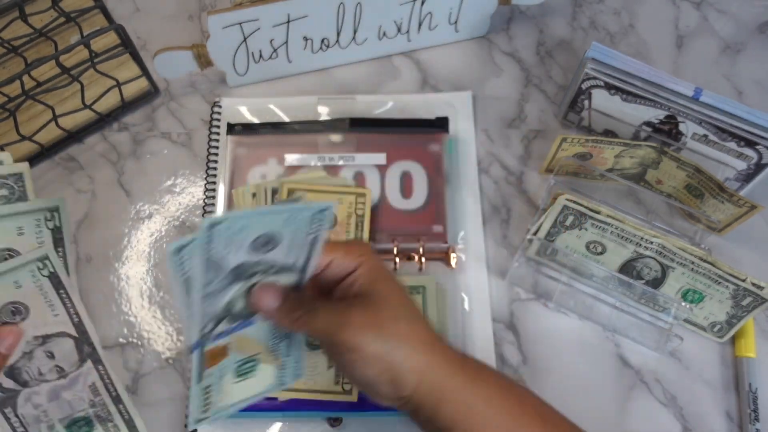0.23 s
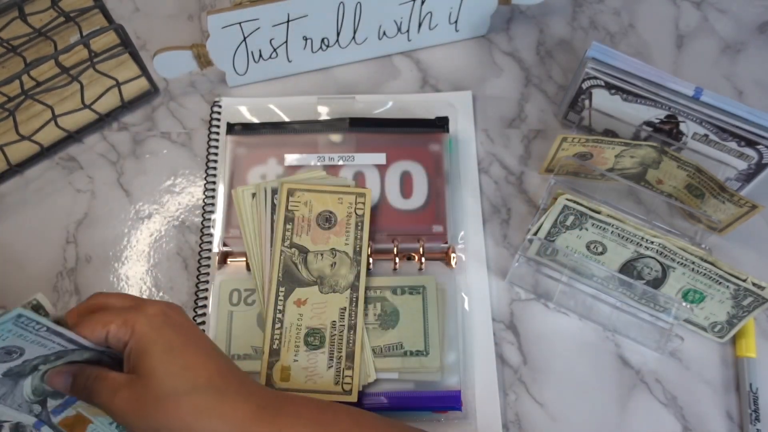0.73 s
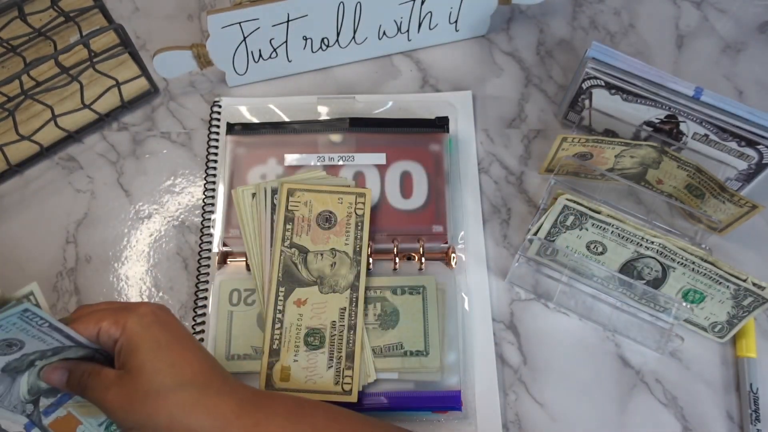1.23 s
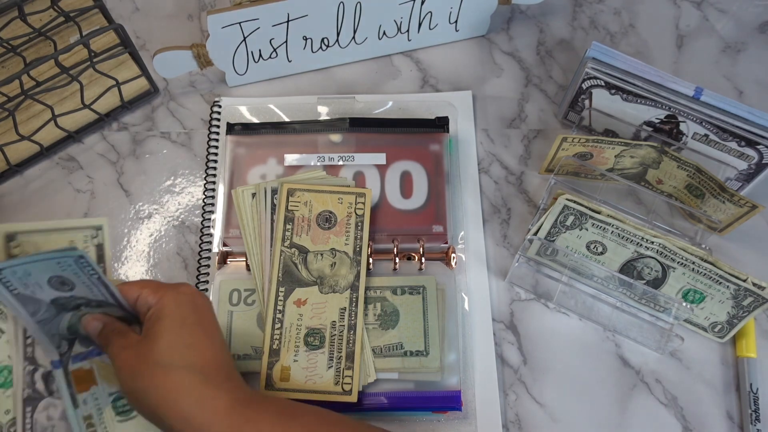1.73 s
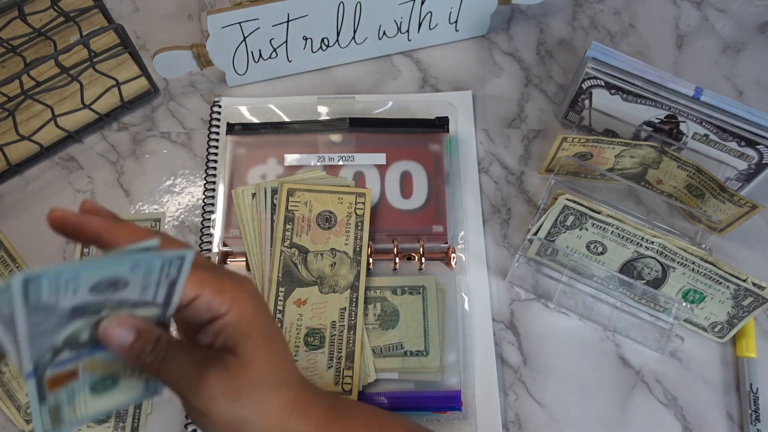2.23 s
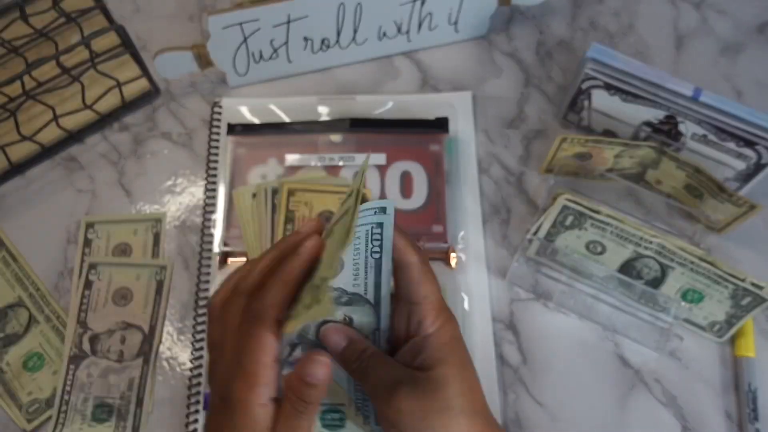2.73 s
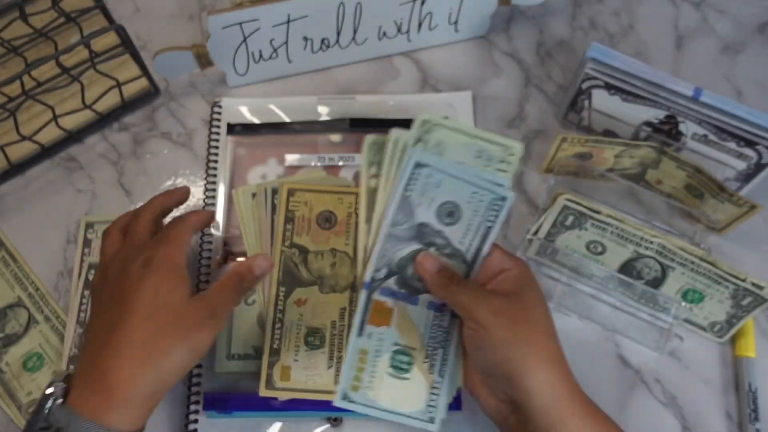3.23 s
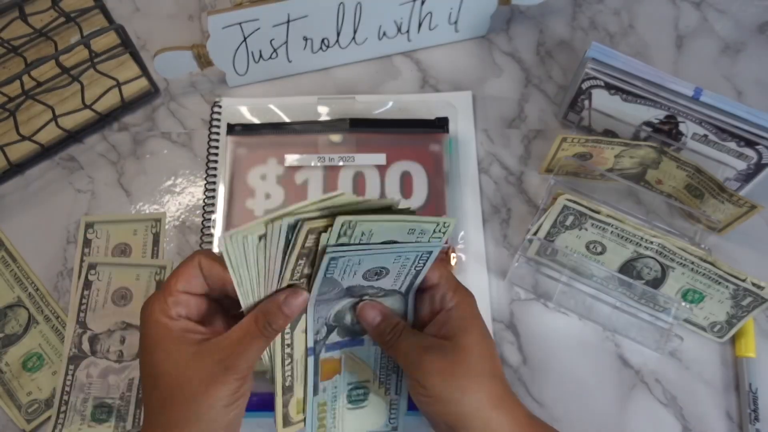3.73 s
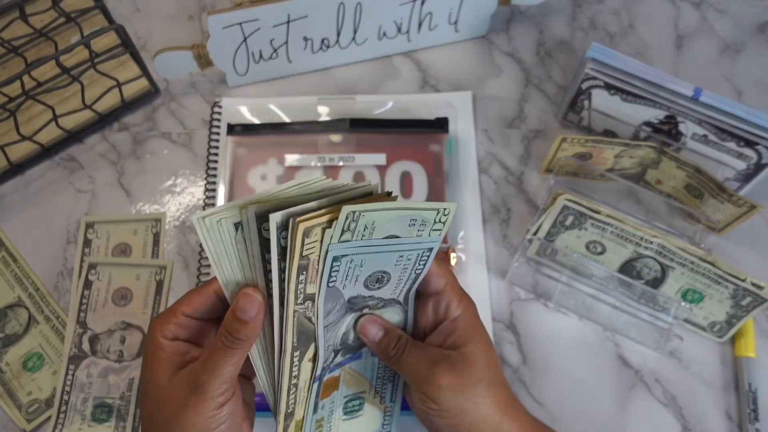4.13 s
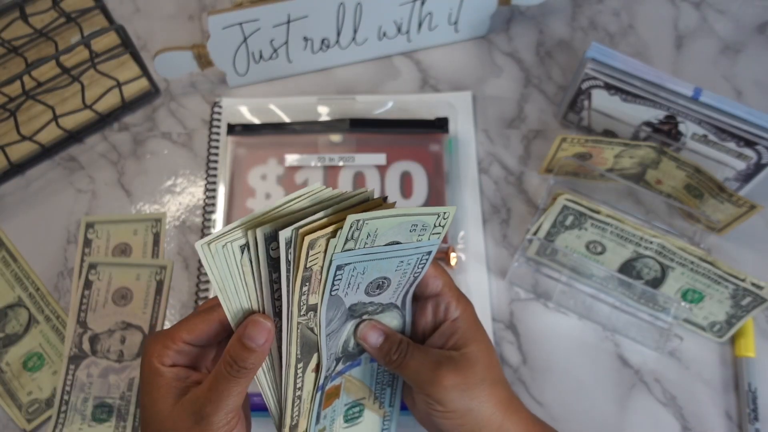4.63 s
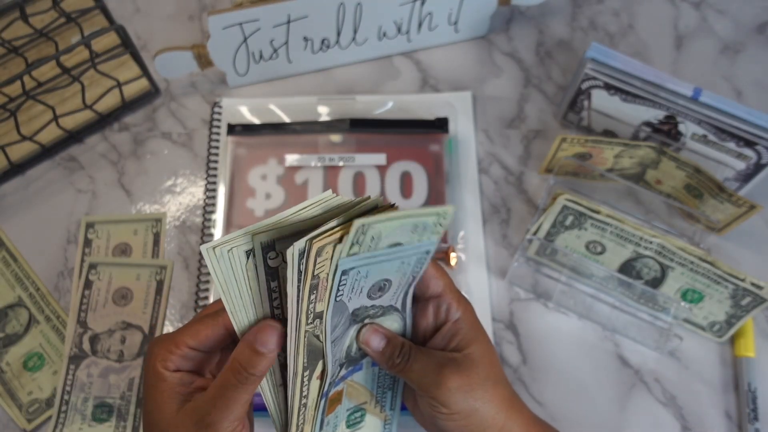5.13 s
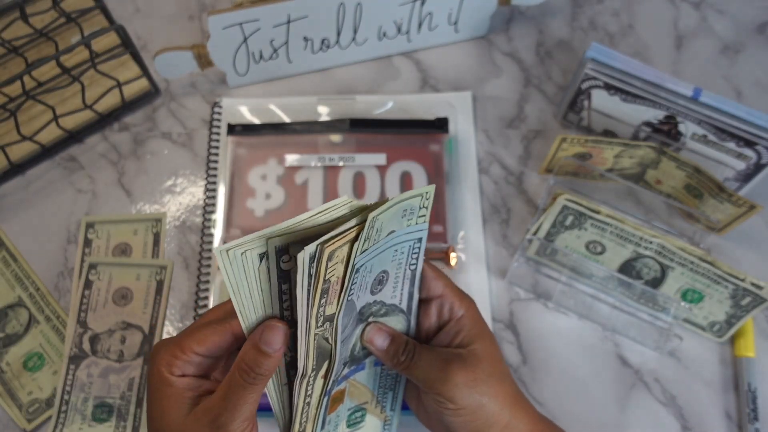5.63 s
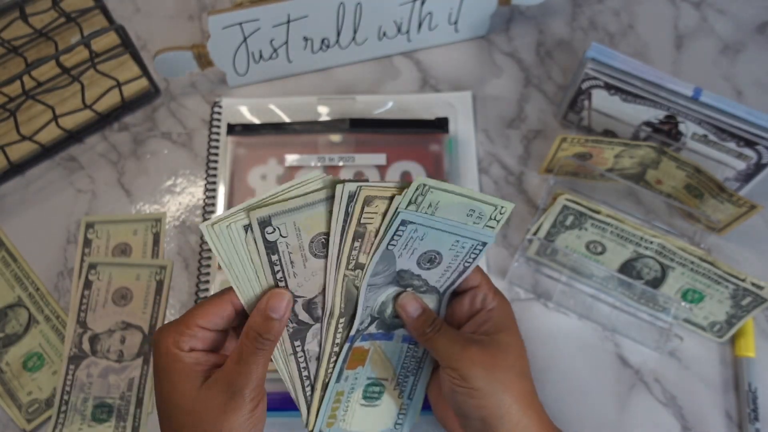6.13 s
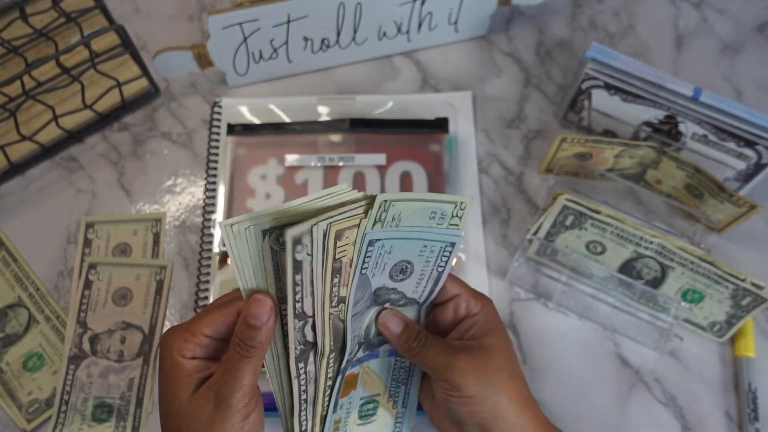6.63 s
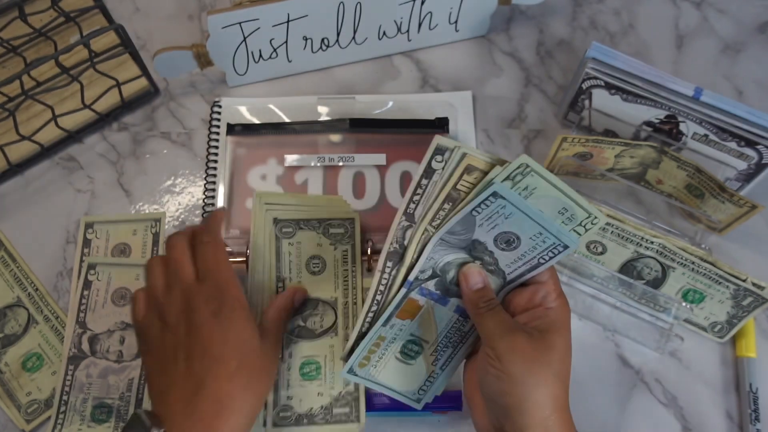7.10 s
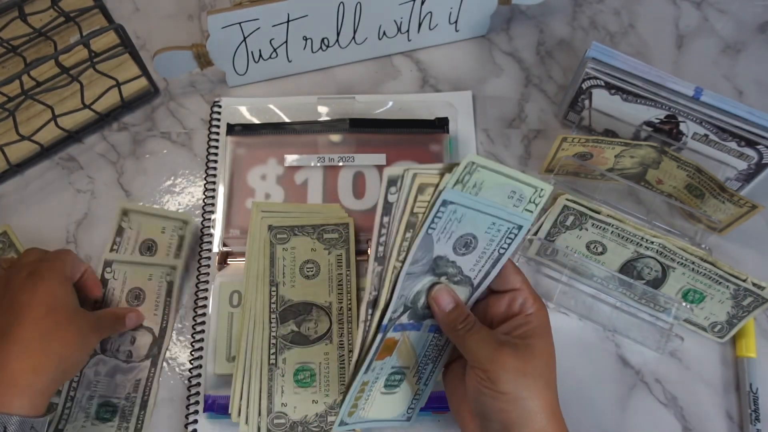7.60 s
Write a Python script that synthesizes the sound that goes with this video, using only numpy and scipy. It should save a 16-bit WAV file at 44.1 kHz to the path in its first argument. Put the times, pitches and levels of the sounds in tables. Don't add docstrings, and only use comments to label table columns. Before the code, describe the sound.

Very close, dry sound of banknotes being handled: dense fibre creaks and sharp buckling cracks as they are gathered, a few strong flicks, then soft edge brushes and tiny ticks while counting. Finally notes are pulled and laid down hard, with hollow table knocks, a short scrape and piercing paper snaps. Small furnished room, steady low rumble and faint microphone hiss.

```python
import sys
import numpy as np
from scipy import signal
from scipy.fft import rfft, irfft
from scipy.io import wavfile
from scipy.ndimage import uniform_filter1d

SR = 44100
rng = np.random.default_rng(int(sys.argv[2]) if len(sys.argv) > 2 else 0)


def transcribe(signal):
    frames = np.atleast_2d(signal).T
    limited = np.clip(frames, -1, 1)
    pcm = np.round(limited * 32767).astype(np.int16)
    wavfile.write(sys.argv[1], SR, pcm)


def voltage_ratio(level):
    return 10 ** (np.asarray(level, float) / 20)


N = 346626

# pitch_hz, level_db (per Hz)
PAPER_COLOUR = [(240, -37), (400, -11.5), (900, -7), (1600, -9), (2100, -3), (2900, 0.5), (3500, 2),
                (4200, 3), (4900, -4.5), (5750, -11), (6600, -9.5), (9000, -14.5), (12000, -18),
                (16000, -30)]
# low_hz, high_hz
PAPER_BANDS = [
    (350, 1900),
    (2000, 5200),
    (6100, 17000),
]

# time_s, hiss_db
HANDLING = [(0, -33.5), (.28, -41.5), (.46, -31.5), (.64, -37), (.94, -35.5), (1.31, -40.5), (1.6, -43),
            (2.05, -40.5), (2.34, -43.5), (2.6, -37), (3.2, -44.5), (3.5, -37.5), (3.87, -48), (5.1, -52.5),
            (5.7, -49), (6.4, -49), (7.2, -45.5), (7.42, -69)]
HANDLING_BODY_DB, HANDLING_SHEEN_DB = -4, -5.5
# peak_s, length_s, hiss_db, body_db (re hiss), sheen_db (re hiss)
PULLS = [(.11, .07, -33, -12, -11), (.22, 0.033, -34, 3.5, 0), (.38, 0.048, -24.5, -2.5, -9),
         (.535, 0.1, -29.5, -5.5, -8), (.6, 0.09, -34.5, -12, 2), (.68, 0.03, -29.5, -4, -1),
         (.86, 0.051, -30, -5, -18), (1.49, 0.2, -36, -5, -22), (1.64, 0.13, -35.5, 5.5, -15),
         (1.74, 0.16, -19, -8.5, -5.5), (1.86, 0.036, -34, -3, -6), (1.99, 0.08, -27.5, -11, -4.5),
         (2.49, 0.074, -32, -0.5, -5), (2.735, 0.08, -19.5, -14, -0.5), (2.87, 0.087, -26.5, -17, -7),
         (3.19, 0.073, -38.5, -16, -9), (3.295, 0.055, -38, 4, -5), (3.39, 0.034, -18, -7, -8.5),
         (3.72, 0.18, -31.5, -7, -5), (3.85, 0.073, -40, 2, -16), (5.19, 0.049, -35, -4, -4),
         (5.27, 0.074, -35, 0, -3), (5.36, 0.19, -44.5, -8, -3), (5.87, 0.3, -36.5, -2.5, -2.5),
         (7.086, 0.035, -24, 4.5, -5), (7.595, 0.043, -22, -5, -3), (7.628, 0.067, -20.5, -2, -5.5),
         (7.86, 0.051, -13.5, -7.5, -1.5)]
# peak_s, length_s, hiss_db, body_db (re hiss), sheen_db (re hiss)
SPRINGS = [(0, 0.034, -33, -2, 5), (.3, 0.096, -31, -20, -5), (.41, 0.053, -27, -3, -2),
           (.7, 0.056, -22, -2.5, -8), (.765, 0.12, -24, -7, -9.5), (1.9, 0.041, -20.5, 2, -20),
           (1.92, 0.15, -35.5, 10.5, -3), (2.405, .06, -30, -11, -2.5), (2.75, 0.11, -14.5, -7, -8),
           (2.8, 0.086, -27, -5, -10.5), (3.0, 0.22, -34.5, -8, -1.5), (3.35, 0.026, -27, -2, -18),
           (3.41, 0.079, -30.5, -8, -12), (3.55, 0.12, -25, -6, -6), (4.27, 0.15, -43.5, -1, -12),
           (6.81, .06, -34, -7, -2), (6.94, 0.14, -30.5, 0, -0.5), (7.0, .06, -31, -11, -9),
           (7.11, 0.21, -38, 0.5, -4.5), (7.44, 0.033, -23, -27, -9), (7.46, 0.14, -35, -1, -21),
           (7.51, 0.041, -28.5, 1, 1), (7.65, 0.12, -26, -4, -6), (7.77, 0.18, -31.5, -5, -5)]
STROKE_DB = 12
PULL_RISE, SPRING_RISE = 0.64, 0.35
# start_s, stop_s
RUBBING_DIPS = [
    (1.882, 1.9),
    (7.4, 7.431),
]

# start_s, kick_peak_db, ring_hz, flutter_db (re kick)
GATHERING_SNAPS = [(.094, -16.5, 647, -20), (0.204, -28, 3620, -6), (.263, -36, 610, -8),
                   (0.293, -32, 647, -24), (.306, -19, 1820, -5.5), (0.347, -3.5, 5130, -14),
                   (.373, -2.5, 3820, -21), (.399, -6.5, 970, -10), (.487, -12.5, 3750, -10),
                   (.662, -8.5, 755, -16), (.7, -2, 4700, -21), (0.764, -17, 3940, -11),
                   (0.859, -15, 3660, -13.5), (1.074, -29, 800, -24), (1.526, -21, 2250, -14),
                   (1.578, -14, 1020, -15.5), (1.591, -24, 990, -21), (1.821, -22.5, 1040, -24),
                   (1.86, -23, 990, -5.5), (1.901, -3.5, 730, -10.5), (2.213, -12.5, 1000, -31),
                   (2.393, -17, 3530, -11.5), (2.434, -30, 830, -2.5), (2.477, -24, 3090, -11),
                   (2.4957, -25, 3980, -16)]
# start_s, kick_peak_db, ring_hz, flutter_db (re kick)
COUNTING_SNAPS = [(2.662, -33, 4190, -16), (2.714, -16, 3850, -9), (2.733, 3, 3700, -17),
                  (2.828, -9.5, 3924, -17), (3.0, -21, 2750, -7.5), (3.273, -25, 1990, -11),
                  (3.339, -13.5, 2420, -13.5), (3.387, -4.5, 2900, -19.5), (3.463, -22, 1400, -15),
                  (3.469, -20, 1520, -16), (3.532, -16.5, 3730, -10), (3.577, -16.5, 3270, -7),
                  (3.684, -30, 3710, -15), (3.748, -23, 2300, -15), (3.7736, -29, 1460, -9),
                  (3.8427, -30, 880, -17), (3.851, -14.5, 3650, -27), (4.331, -18.5, 680, -22),
                  (4.7794, -40, 832, -11), (5.163, -28, 4180, -12), (5.2654, -15, 3420, -18),
                  (5.828, -24.5, 4100, -10), (6.141, -26, 603, -15)]
# start_s, kick_peak_db, ring_hz, flutter_db (re kick)
LAYING_SNAPS = [(6.802, -14, 4200, -20), (6.888, -29, 826, -10), (6.903, -19, 3660, -10),
                (6.9808, -14, 1510, -9), (7.004, -13.5, 1430, -11), (7.045, -14, 980, -6.5),
                (7.084, -4.5, 3970, -12.5), (7.4337, -3, 3540, -15), (7.496, -10, 640, -18),
                (7.515, -15.5, 3400, -9), (7.545, -16, 3400, -12), (7.5618, -8, 4670, -9),
                (7.58, 2.5, 4370, -11), (7.62, 0, 4270, -22), (7.667, -8.5, 4100, -12.5),
                (7.754, -20.5, 850, -24), (7.773, -10, 4400, -12.5), (7.842, 5, 4250, -12.5)]
# body_db, sheen_db
GRIPS = [
    (-1, -2.5),
    (-0.5, 4),
    (-2, 0),
]
BODY_DB_PER_OCTAVE = -3.5

# start_s, peak_db, push_hz, ring_hz, ring_db (re push)
CRACKS = [(0.094, -21, 2000, 2500, -6), (.1235, -18, 610, 594, -4), (.1495, -28, 1500, 4000, -2),
          (.352, -16, 1200, 3000, -10), (.3995, -12, 1860, 895, 1.5), (.444, -24, 1500, 870, 2),
          (.6615, -30, 1010, 776, 10), (.6995, -7, 2470, 4600, -9), (1.0745, -33.5, 1200, 855, 7),
          (1.9004, -2, 1780, 3350, -3), (1.9019, -8, 1780, 3300, -6), (2.2125, -22, 1210, 980, -3),
          (2.7335, -25, 3000, 3680, 4), (3.348, -16, 2510, 4030, -2), (3.5785, -6, 1830, 3480, 8),
          (4.138, -24, 1690, 1750, -3), (4.3316, -24, 1220, 700, -3), (5.266, -24, 1500, 2010, -3),
          (7.0912, -11.5, 1490, 1900, -8), (4.779, -37, 1800, 1690, 7.5), (6.1415, -37, 1790, 646, -8),
          (6.9825, -7.5, 1430, 1500, -5), (6.9838, -8.5, 1410, 1450, -15), (7.4335, -10, 800, 3600, 4.5),
          (7.58, -18, 2500, 4200, -9), (7.6202, -3.5, 3520, 4200, 6), (7.6215, -1, 3500, 6300, 3)]
ECHO_MS, ECHO_DB = 1.26, -12

# middle_s, length_s, hiss_db, sheen_db
BRUSHES = [(6.797, 0.074, -35.5, -38), (0.214, 0.024, -36, -46), (3.295, 0.07, -41, -44),
           (4.11, 0.04, -45, -48), (4.279, 0.15, -40.5, -39.5), (5.204, 0.11, -42, -40.5),
           (5.858, 0.12, -39.5, -37.5), (6.906, 0.069, -37, -35)]
# start_s, stop_s, sheen_db
ZIPS = [(4.114, 4.133, -39.5), (5.257, 5.271, -36), (3.175, 3.203, -41), (6.99, 7.012, -32),
        (3.385, 3.415, -34), (2.394, 2.51, -40.5), (3.528, 3.6, -37.5), (7.771, 7.788, -27),
        (2.821, 2.875, -32), (6.889, 6.967, -34), (7.05, 7.1, -31), (7.495, 7.531, -25.5),
        (7.604, 7.634, -17.5)]
ZIP_GROWS_DB = 4.5
# start_s, peak_db, sheen_db (re hiss)
TICKS = [(0.027, -27, -8), (.036, -35, -10), (.264, -33, 9), (.306, -35, -1), (.321, -28, -4),
         (.341, -28, -12), (0.356, -23, 4), (.392, -26, -10), (.414, -20, -2), (.425, -21, -3),
         (.441, -21, -10), (.461, -39, 5), (.4875, -25, 5), (.51, -30, -8), (0.662, -19, -4),
         (.674, -34, 3), (.682, -26, 2), (0.702, -20, -12), (.785, -26, -4), (0.791, -28, -3),
         (.797, -30, -6), (.835, -27, -13), (1.859, -30, 3), (1.913, -24, -8), (1.957, -30, -4),
         (2.745, -17, -1), (2.751, -19, -3), (2.759, -18, -5), (2.768, -19, -8), (2.829, -30, -12),
         (2.85, -26, -4), (2.873, -32, -3), (2.977, -40, 6), (3.005, -24, 6), (3.017, -36, 8),
         (3.047, -42, 10), (3.052, -42, 10), (3.2833, -30, -6), (3.312, -38, 6), (3.59, -20, -3),
         (3.633, -30, -1), (3.73, -31, -3), (4.129, -49, 14), (5.266, -26.5, 9.5), (5.28, -36, 0),
         (6.955, -30, 3), (7.008, -28, 0), (6.982, -11, -1), (7.0455, -20, 2), (7.18, -29.5, 0),
         (7.58, -6, 2), (7.843, -19, -5), (7.431, -18, -3), (7.5156, -18, 5), (7.565, -18, -9),
         (7.612, -20, 0), (7.627, -17, -6), (7.633, -17, 0), (7.65, -19, -8), (7.774, -24, 6),
         (7.786, -28, 2), (7.822, -22, -4)]
TICK_T60_S = 0.0065
# start_s, stop_s,
# from_hz, to_hz, rms_db
WHISTLES = [(0.52, 0.572, 2400, 2400, -36.5), (1.6, 1.645, 6600, 6600, -42), (1.687, 1.77, 7000, 6700, -34),
            (2.718, 2.772, 6700, 6900, -32), (2.782, 2.816, 4200, 2600, -37),
            (3.346, 3.398, 2250, 3400, -32), (3.53, 3.575, 4000, 3600, -35), (3.601, 3.7, 3700, 3800, -38),
            (4.235, 4.32, 4200, 3600, -40), (5.21, 5.268, 3700, 3750, -42), (1.93, 2.01, 5400, 5400, -45),
            (0.17, .232, 5200, 4000, -42), (7.6, 7.67, 300, 297, -26), (7.49, 7.55, 300, 310, -27),
            (7.843, 7.86, 6800, 7300, -18), (7.771, 7.782, 5300, 6300, -24), (7.513, 7.53, 5700, 7400, -24),
            (6.9, 6.97, 6600, 6700, -41), (7.445, 7.49, 3350, 3600, -33), (7.49, 7.555, 3450, 3350, -35),
            (7.46, 7.515, 520, 610, -27), (7.48, 7.53, 1100, 1120, -31), (7.66, 7.73, 4100, 4200, -34)]
WHISTLE_WIDTH = 0.034

# start_s, peak_db, contact_ms
KNOCKS = [(0.1235, -29, 1.2), (0.132, -29.5, 1), (0.139, -44, 1.2), (1.901, -20.5, 3.3), (2.451, -39, 0.86),
          (7.088, -27.5, 2.2), (7.434, -18, 0.74), (7.603, -13, 1.7), (7.721, -24, 2.9)]
# pitch_hz, level_db, t60_s
TABLE_MODES = [(299, 3, .17), (350, -10, .05), (420, -3, .1), (475, -3, .1), (530, -5, .07), (700, -9, .06),
               (950, -11, .05), (1150, -16, .03)]
# start_s, peak_db, pitch_hz, t60_s
BUMPS = [(0.69, -25, 94, 0.4), (2.637, -23.5, 104.4, 0.77), (3.368, -25.5, 125, 0.089),
         (6.932, -27, 97, 0.42), (7.433, -16, 94, 0.26), (7.435, -9, 163, 0.09), (7.434, -17, 500, 0.12),
         (7.452, -18, 480, 0.098), (7.434, -24, 1200, .06), (7.605, -19, 390, 0.076),
         (1.903, -22, 700, .12), (.664, -27, 600, 0.072), (7.599, -23, 180, 0.14),
         (7.656, -26.5, 190, 0.52)]
# time_s, level_db
DRAG = [(7.429, -42), (7.434, -14.5), (7.514, -20), (7.588, -37), (7.606, -27), (7.676, -44),
        (7.776, -21.5), (7.838, -41), (7.86, -11.5)]

ROOM_T60_S, ROOM_DB = 0.2, -20
# pitch_hz, level_db (per Hz)
RUMBLE_COLOUR = [(8.8, -32), (15, 5.5), (31, -8), (59, -13), (206, -28.5), (315, -33), (347, -32.5),
                 (551, -38.5), (794, -42.5), (1500, -53.5), (1950, -51), (3300, -120)]
RUMBLE_DB = -24.5
# pitch_hz, level_db (per Hz)
HISS_COLOUR = [(500, -16.5), (1200, -8), (2600, -13), (3500, -8.5), (4300, -1.5), (5000, -4), (5700, -5.5),
               (6500, -7), (9000, -12.5), (14500, -23), (15600, -15), (16500, -48)]
HISS_DB = -46.5
TOP_HZ = 15900


def unit(x):
    return x / np.sqrt(np.mean(x ** 2))


def colour(x, points):
    hz, db = np.transpose(points)
    grid = np.linspace(1, SR / 2, 4097)
    log_gain = np.interp(np.log(grid), np.log(hz), db) * np.log(10) / 20
    cepstrum = irfft(log_gain)
    cepstrum[1:4096] *= 2
    cepstrum[4097:] = 0
    impulse = irfft(np.exp(rfft(cepstrum)))
    return signal.fftconvolve(x, impulse, axes=-1)[..., :N]


def band(x, edges):
    return signal.sosfilt(signal.butter(3, edges, "bandpass", fs=SR, output="sos"), x)


def walk(rate):
    hold = int(SR / rate)
    steps = np.repeat(rng.standard_normal(N // hold + 1), hold)
    return unit(uniform_filter1d(uniform_filter1d(steps, hold), hold)[:N])


def fade(t, t60):
    return np.exp(-np.log(1000) * t / t60)


def add(track, s, sound):
    i = int(s * SR)
    track[..., i:i + sound.shape[-1]] += sound[..., :N - i]


def rubbing():
    grip = voltage_ratio(1.12 * walk(35) + 1.78 * walk(170))
    crackle = creases(count=12000)
    gains = sliding() * voltage_ratio([[-7.5], [-6.5], [-3.0]])
    tracks = []
    for gain, crackle_share in zip(gains, (0.6, 0.5, 0.5)):
        fibres = rng.standard_normal(N) + crackle_share * crackle
        tracks.append(gain * voltage_ratio(1.5 * walk(30)) * grip * fibres)
    rub = np.array(tracks)
    for start, stop in RUBBING_DIPS:
        rub[:, int(start * SR):int(stop * SR)] *= voltage_ratio(-14)
    return rub


def sliding():
    t = np.arange(N) / SR
    handling_db = np.interp(t, *np.transpose(HANDLING))
    power = voltage_ratio([[HANDLING_BODY_DB], [0], [HANDLING_SHEEN_DB]] + handling_db) ** 2
    for strokes, rise in ((PULLS, PULL_RISE), (SPRINGS, SPRING_RISE)):
        for s, length, hiss_db, body_db, sheen_db in strokes:
            near = slice(max(int((s - 3 * length) * SR), 0), int((s + 3 * length) * SR))
            away = np.maximum((s - t[near]) / rise, (t[near] - s) / (1 - rise)) / length
            stroke_db = hiss_db - STROKE_DB * away
            power[:, near] += voltage_ratio([[body_db], [0], [sheen_db]] + stroke_db) ** 2
    return np.sqrt(power)


def creases(count):
    when, pitch, size = rng.random((count, 3)).T
    hz = 600 * 16.0 ** pitch[:, None]
    t = np.arange(400) / SR
    level = voltage_ratio(np.minimum(-3.5 * np.log(size), 8.5))[:, None]
    grains = level * np.sin(2 * np.pi * hz * t) * np.exp(-t * np.sqrt(hz) * 30)
    place = (when * (N - 400)).astype(int)[:, None] + np.arange(400)
    return unit(np.bincount(place.ravel(), (grains * np.sqrt(hz)).ravel(), N))


def snaps():
    t = np.arange(6000) / SR
    kicks, flutter = np.zeros(N), np.zeros((3, N))
    swell = 1 - np.exp(-t / np.array([[0.0003], [0.0003], [0.0025]]))
    stages = (GATHERING_SNAPS, COUNTING_SNAPS, LAYING_SNAPS)
    buckles = [(*snap, *grip) for table, grip in zip(stages, GRIPS) for snap in table]
    for s, peak_db, hz, hiss_db, body_db, sheen_db in buckles:
        ring = np.sin(2 * np.pi * hz * t) * np.exp(-t * hz / 3.0) * (1 - np.exp(-t / 0.0003))
        ring *= voltage_ratio(-2.5) * min(hz / 1000.0, 1)
        shiver = band(rng.standard_normal(len(t)), (hz * 0.77, hz * 1.12)) * fade(t, 0.023)
        shiver *= voltage_ratio(-20.5) / np.abs(shiver).max()
        add(kicks, s, voltage_ratio(peak_db) * (ring + shiver))
        body_db = body_db + BODY_DB_PER_OCTAVE * np.log2(hz / 2000)
        shares = voltage_ratio(hiss_db + np.array([[body_db], [0], [sheen_db]]))
        noise = rng.standard_normal((3, len(t)))
        add(flutter, s, voltage_ratio(peak_db) * shares * swell * fade(t, 0.033) * noise)
    return kicks, flutter


def cracks():
    t, out = np.arange(800) / SR, np.zeros(N)
    for s, peak_db, push_hz, ring_hz, ring_db in CRACKS:
        late = (t * push_hz - 0.8) * np.sqrt(2) * np.pi
        push = (1 - late ** 2) * np.exp(-late ** 2 / 2)
        onset = 1 - np.exp(-(t / 0.00015) ** 2)
        ring = np.sin(2 * np.pi * ring_hz * t) * np.exp(-t * ring_hz / 3.1) * onset
        add(out, s, voltage_ratio(peak_db) * (push + voltage_ratio(ring_db) * ring))
        add(out, s + ECHO_MS / 1000, voltage_ratio(peak_db + ECHO_DB) * push)
    return out


def brushes():
    out = np.zeros((3, N))
    for s, length, hiss_db, sheen_db in BRUSHES:
        size = int(length * SR)
        stroke = np.hanning(size) * rng.standard_normal((2, size))
        add(out[1:], s - length / 2, voltage_ratio([[hiss_db], [sheen_db]]) * stroke)
    return out


def slips():
    out, t = np.zeros((3, N)), np.arange(800) / SR
    for start, stop, sheen_db in ZIPS:
        size = int((stop - start) * SR)
        growth_db = ZIP_GROWS_DB * np.linspace(-1, 0, size)
        add(out[2], start, voltage_ratio(sheen_db + growth_db) * rng.standard_normal(size))
    for s, peak_db, sheen_db in TICKS:
        levels = voltage_ratio([[peak_db - 24], [peak_db], [peak_db + sheen_db]])
        add(out, s, levels * fade(t, TICK_T60_S) * rng.standard_normal(len(t)))
    return out


def paper_bands(tracks):
    click = colour(np.arange(N) == 0, PAPER_COLOUR)
    out = np.zeros(N)
    for track, edges in zip(tracks, PAPER_BANDS):
        gain = np.linalg.norm(band(click, edges))
        out += band(colour(track, PAPER_COLOUR), edges) / gain
    return out


def whistles():
    out = np.zeros(N)
    for start, stop, from_hz, to_hz, rms_db in WHISTLES:
        size = int((stop - start) * SR)
        smooth = signal.butter(2, WHISTLE_WIDTH * from_hz + 40, fs=SR)
        waver = signal.lfilter(*smooth, rng.standard_normal((2, 6000)))[:, -size:]
        carrier = np.exp(2j * np.pi * np.cumsum(np.linspace(from_hz, to_hz, size)) / SR)
        tone = unit(waver[0] * carrier.real + waver[1] * carrier.imag)
        add(out, start, voltage_ratio(rms_db) * np.sqrt(np.hanning(size)) * tone)
    return out


def knocks():
    t, force, thumps = np.arange(20000) / SR, np.zeros(N), np.zeros(N)
    top = sum(voltage_ratio(db) * np.sin(2 * np.pi * hz * t) * fade(t, t60) for hz, db, t60 in TABLE_MODES)
    for s, peak_db, contact_ms in KNOCKS:
        push = np.hanning(int(contact_ms * SR / 1000) + 3)
        add(force, s, voltage_ratio(peak_db) * push / push.sum())
    drag_db = np.interp(np.arange(N) / SR, *np.transpose(DRAG), left=-120)
    force += voltage_ratio(drag_db - 4.5) * rng.standard_normal(N) / np.linalg.norm(top)
    for s, peak_db, hz, t60 in BUMPS:
        onset = 1 - np.exp(-t / 0.0015)
        add(thumps, s, voltage_ratio(peak_db) * np.sin(2 * np.pi * hz * t) * fade(t, t60) * onset)
    scrape = voltage_ratio(drag_db - 11.0) * unit(band(rng.standard_normal(N), (380, 1250)))
    return thumps + scrape + signal.fftconvolve(force, top)[:N]


def room(x):
    t = np.arange(16000) / SR
    tail = band(rng.standard_normal(len(t)), (100, 7000)) * fade(t, ROOM_T60_S) * (t > 0.004)
    return x + voltage_ratio(ROOM_DB) * signal.fftconvolve(x, tail / np.linalg.norm(tail))[:N]


def air():
    rumble = unit(colour(rng.standard_normal(N), RUMBLE_COLOUR))
    hiss = unit(colour(rng.standard_normal(N), HISS_COLOUR))
    return voltage_ratio(RUMBLE_DB + 0.19 * walk(1.5)) * rumble + voltage_ratio(HISS_DB + 0.37 * walk(3.2)) * hiss


def scene():
    kicks, flutter = snaps()
    paper = paper_bands(rubbing() + flutter + brushes() + slips())
    hands = kicks + cracks() + knocks() + whistles()
    return (room(paper + hands) + air())[None]


def low_pass(x):
    return signal.sosfilt(signal.butter(12, 16450, fs=SR, output="sos"), x)


def record(dry):
    rounded = np.tanh(0.54 * dry) / 0.67
    cut = signal.ellip(10, 0.2, 85, TOP_HZ, fs=SR, output="sos")
    mix = signal.sosfilt(cut, rounded)
    return low_pass(mix)


dry = scene()
out = record(dry)
transcribe(out)
```